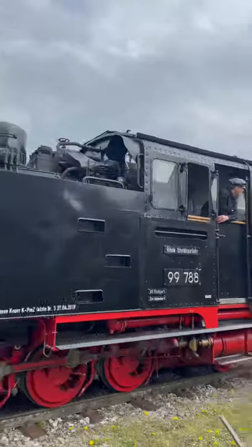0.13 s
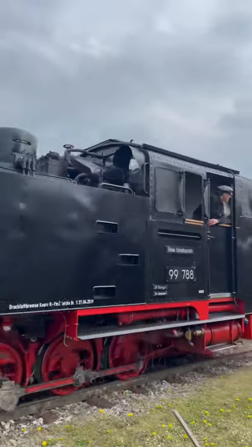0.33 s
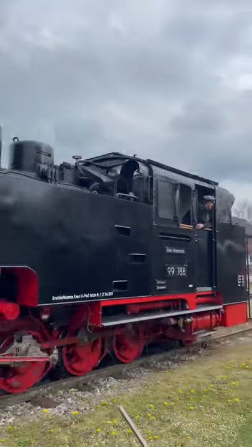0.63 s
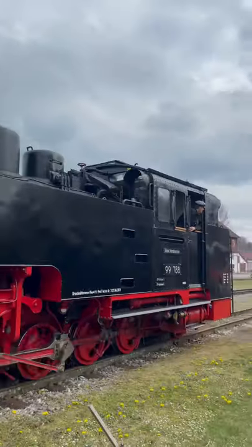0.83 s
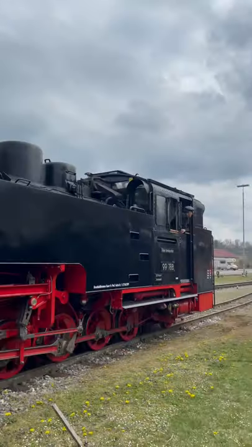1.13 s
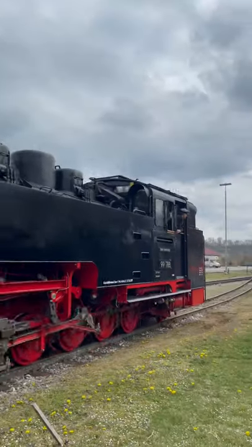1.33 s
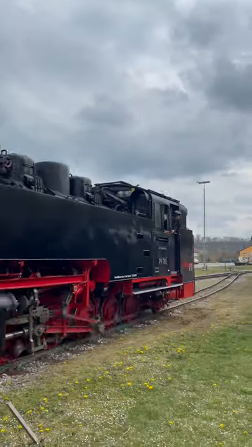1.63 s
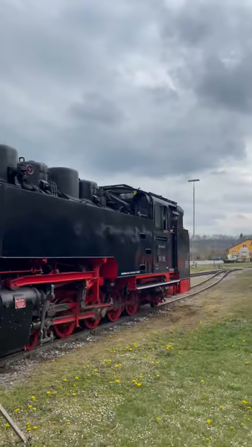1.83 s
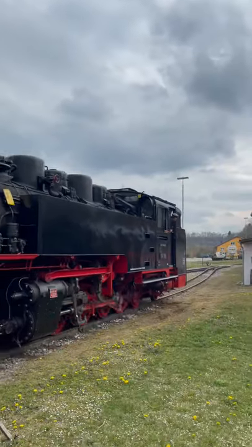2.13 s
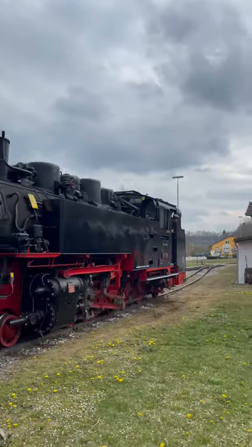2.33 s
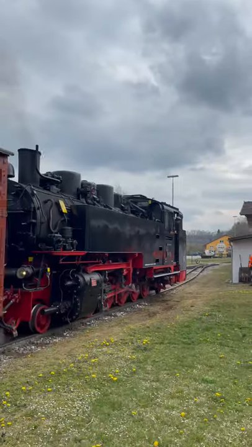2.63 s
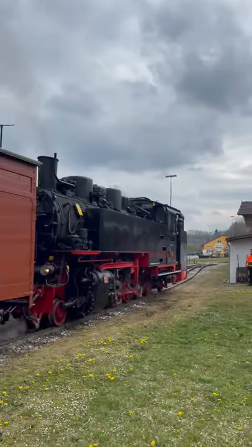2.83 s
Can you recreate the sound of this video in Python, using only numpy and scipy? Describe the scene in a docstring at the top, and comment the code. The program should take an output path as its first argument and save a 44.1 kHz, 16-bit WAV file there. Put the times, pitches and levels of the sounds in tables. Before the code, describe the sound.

Close stereo pickup in the open: a heavy steam engine passes, hissing at first, clanking over a rail joint several times, its thudding and rumble growing stronger, with puffs, metallic rattles, thin squeaks and low wind.

```python
"""Steam locomotive passing close by

A steam locomotive rolls past at walking pace, a few metres off, in the open.
Low sagging sines make exhaust beats thud over a rumble of coloured noise; contacts ring the iron at a rail joint.
Noise bursts make steam puffs and brief metallic rattles, a hiss lies high, rims sing, thin tones squeak, wind stirs.
Between the two stereo channels the phase lag broadly grows with pitch; likeness and balance vary with it too."""
import sys
import numpy as np
from scipy import signal
from scipy.fft import rfft, irfft, next_fast_len
from scipy.io import wavfile

SR = 44100
rng = np.random.default_rng(int(sys.argv[2]) if len(sys.argv) > 2 else 0)


def wav_out(sig):
    """Save sig, one row per channel (or a flat mono array), as 16-bit PCM at SR to the path in sys.argv[1]."""
    wavfile.write(sys.argv[1], SR, np.round(np.clip(np.atleast_2d(sig).T, -1, 1) * 32767).astype(np.int16))


def rack_gain(trim_db):
    """Turn a fader trim in dB into the linear factor to multiply a signal by."""
    fader = np.asarray(trim_db, float)
    return 10 ** (fader / 20)


N = 131859  # length in samples

# Rolling levels. Each row: time in seconds, deep rumble in dB, frame drumming in dB, wheel roar in dB.
ROLLING_LEVELS = [(0, -25, -35, -32), (.15, -31.5, -30, -32.5), (.33, -30, -32, -35),
                  (.5, -32.5, -35, -36.5), (.67, -34, -36, -33.5), (.78, -34, -28.5, -35),
                  (.87, -29, -22.5, -33), (1.0, -24, -25.5, -33.5), (1.15, -27, -26, -29.5),
                  (1.3, -28, -27, -31.5), (1.44, -24, -20, -33.5), (1.6, -22, -24.5, -28),
                  (1.78, -23, -21.5, -30.5), (1.93, -27, -25.5, -29.5), (2.13, -21.5, -23, -30),
                  (2.34, -20, -22.5, -25), (2.5, -32, -22, -28), (2.66, -21, -19.5, -27),
                  (2.8, -38, -20.5, -29), (2.99, -20.5, -26.5, -22)]
# Colour of the deep rumble. Each row: frequency in Hz, relative density in dB per Hz.
RUMBLE_COLOUR = [(22, -33), (32, -23), (45, -3), (63, 5), (85, -2.5), (120, -12), (200, -10)]
# Colour of the drumming frame. Each row: frequency in Hz, relative density in dB per Hz.
DRUMMING_COLOUR = [(80, -6.5), (130, -1), (180, -0.5), (250, 0), (330, -3.5), (420, -10.5), (700, -20),
                   (1200, -37)]
# Colour of the wheel roar. Each row: frequency in Hz, relative density in dB per Hz.
ROAR_COLOUR = [(250, -2), (450, 0), (700, -1), (1200, -4), (1700, -8), (2700, -10), (3800, -12),
               (5000, -18.5), (7000, -19), (9000, -26)]
# Low thuds: exhaust beats and bumps of the wheels. Each row: start in seconds, level in dB, settled pitch in Hz.
THUDS = [(.005, -25, 62), (0.056, -13, 156), (.09, -12, 57.4), (0.204, -13.5, 104.4), (.23, -14, 55),
         (.275, -19, 94), (0.359, -21, 80.6), (.465, -19, 80), (.71, -19, 77), (0.799, -26, 69),
         (0.829, -14, 167), (0.57, -15, 58.6), (0.85, -14, 60.4), (0.959, -9.5, 68), (1.13, -14, 59.6),
         (1.41, -23, 156), (1.511, -17, 55.7), (1.697, -7, 92), (1.98, -10, 75), (2.26, -11, 92.7),
         (2.545, -9.5, 70.4), (2.827, -25, 157)]
# Wheels on the joint. Each row: start in seconds, level in dB, low end in dB, treble in dB,
# fading time of the chatter in seconds, first contact in dB, best-driven pitch in Hz.
JOINT_BLOWS = [(.0572, -7, -2, -4, .011, 3, 1400), (.54, -8, -3, -5, .007, 3, 2550),
               (.545, -10, -1, -9, .006, 0, 1100), (1.4469, -5, -4, -5, .013, 2, 2150),
               (2.141, -11, -3, -8, .008, 8, 2150), (2.8453, -11, 0, -1, .004, 2, 2100),
               (2.8495, -6, 1, -4, .015, 2, 830)]
# Modes of the iron. Each row: frequency in Hz, level in dB, time to fall 60 dB in seconds.
IRON_MODES = [(250, -16.5, 0.13), (350.4, -17.5, 0.16), (556, -27, 0.084), (706, -19, 0.069),
              (850, -19.5, 0.059), (1070, -19, 0.07), (1430, -30, 0.044), (1623, -22, 0.035),
              (2180, -31, 0.041), (2430, -29, 0.096), (2690, -35, 0.055), (3250, -16.5, 0.033),
              (3790, -18, 0.042), (4425, -19.5, 0.055), (6050, -31, 0.04), (6700, -28, 0.032)]
# Short cracks of the contacts. Each entry: frequency in Hz.
CRACK_PITCHES = [1100, 2500, 6000]
# Colour of the crash. Each row: frequency in Hz, relative density in dB per Hz.
CRASH_COLOUR = [(150, 7), (300, 1.5), (700, 1.5), (1200, -3.5), (2000, -7), (3000, -5), (5000, -11.5),
                (6500, -9.5), (9000, -1), (12000, -5), (14500, -64)]
# Noise bursts: steam puffs and brief metallic rattles. Each row: time of full blast in seconds, level in dB,
# rise in seconds, fall in seconds, dullness in dB lost per band going up.
NOISE_BURSTS = [(.42, -32, 0.074, 0.14, 1.5), (.86, -34, 0.012, 0.045, 8), (.985, -26.5, 0.0092, 0.028, 3),
                (1.045, -31.5, 0.02, 0.025, 0.5), (1.08, -34, 0.019, 0.031, -1),
                (1.495, -21, 0.065, 0.054, 5), (1.539, -20.5, 0.018, 0.027, -0.5),
                (1.644, -24, 0.043, 0.022, 3.5), (1.705, -25, 0.029, 0.033, 2.5),
                (1.85, -34, 0.096, 0.072, 1), (2.165, -39, 0.0088, 0.023, 11),
                (2.194, -19.5, 0.028, 0.029, 10), (2.286, -20.5, 0.027, 0.034, 2.5),
                (2.35, -21.5, 0.022, 0.042, 1), (2.46, -35, 0.023, 0.032, -1),
                (2.58, -29, 0.0092, 0.033, 0.5), (2.671, -32, 0.039, 0.026, 0.5),
                (2.918, -24, 0.034, 0.031, 3), (2.945, -19, 0.027, 0.04, -1)]
# Colour of the bursts, with a gap near 9 kHz. Each row: frequency in Hz, relative density in dB per Hz.
BURST_COLOUR = [(400, 0.5), (800, 4.5), (1200, -2.5), (1700, 3), (2700, 2), (4400, 2), (6000, 0),
                (7000, -3.5), (8000, -1), (9200, -24), (11000, -1.5), (13000, -32)]
# High hiss. Each row: time in seconds, level of the hiss in dB, level of a separate band above 12 kHz in dB.
HISS_LEVELS = [(0.0, -29.5, -47), (0.08, -29.5, -43), (0.34, -32, -49), (0.62, -33.5, -54),
               (1.34, -34, -54), (1.65, -36, -72), (2.05, -37.5, -60), (2.46, -36.5, -77), (2.65, -37, -63),
               (2.99, -34.5, -58)]
# Colour of the hiss. Each row: frequency in Hz, relative density in dB per Hz.
HISS_COLOUR = [(4000, -21), (6000, -18), (7000, -13.5), (8000, -11), (9000, -7), (10000, -2), (10900, 1),
               (11500, -4), (12000, -11.5), (12600, -17), (13200, -28)]
# Colour of the separate band above 12 kHz. Each row: frequency in Hz, relative density in dB per Hz.
TOP_BAND_COLOUR = [(11800, -20), (12600, -2), (13300, -6), (14000, -13), (15800, -11)]
# Wheel rims singing on the rail. Each row: frequency in Hz, level in dB before swing and fade-in.
RIM_TONES = [(1190, -53.5), (1590, -48)]
# Squeaks of flanges and rods. Each row: start in seconds, length in seconds, mean pitch in Hz, level in dB.
SQUEAK_TONES = [(.395, .06, 3850, -45), (.4, .04, 3200, -46), (.47, .035, 3300, -44), (.58, .03, 1580, -43),
                (.88, .05, 2350, -46), (.87, .07, 1600, -45), (.97, .035, 2480, -40),
                (.985, .05, 3300, -44), (1.035, .035, 3280, -41), (1.035, .03, 3480, -43),
                (1.065, .03, 4080, -45), (1.075, .11, 2360, -41), (1.07, .08, 3730, -47),
                (1.18, .09, 4350, -50), (1.32, .05, 3740, -48), (1.375, .075, 3710, -46),
                (1.68, .05, 3100, -44), (2.34, .05, 3850, -41), (2.94, .03, 4700, -41)]
# Stereo phase, likeness and balance by pitch; the channels are nearly alike around 6, 9 and above 12 kHz.
# Each row: frequency in Hz, lead of the left channel in radians, likeness from 0 to 1, left over right in dB.
STEREO_BY_PITCH = [(30, .2, .9, .5), (250, .05, .97, .7), (450, .2, .9, 1), (700, .45, .75, 3.8),
                   (1200, .15, .8, 2.5), (1700, .1, .93, 2.5), (2200, .25, .75, 1), (2700, 1.2, .35, .8),
                   (3200, 2.3, .5, 1.8), (3800, 1.1, .35, 1), (4400, 1.8, .6, .8), (4900, 3.2, .8, -1.5),
                   (5500, 5.6, .75, .3), (5900, 6.28, .97, 0), (6300, 6.5, .95, 0), (7000, 7.5, .75, -.4),
                   (7900, 8.8, .8, -.5), (8300, 9.25, .985, 0), (8900, 9.35, .997, 0),
                   (9050, 9.42, .9999, 0), (9600, 9.43, .9999, 0), (9900, 9.85, .95, 0),
                   (11000, 11.1, .92, 0), (11600, 11.9, .95, 0), (11900, 12.566, 1, 0),
                   (14300, 12.566, 1, 0), (14600, 15.5, .97, 0)]
# Colour of the wind in each channel. Each row: frequency in Hz, relative density in dB per Hz.
WIND_COLOUR = [(25, -16), (45, -16), (70, 2.5), (150, -1), (300, -8), (600, -15.5), (1000, -20.5)]


def in_time(rows):
    """Columns of a curve, sample by sample."""
    s, *columns = np.transpose(rows)
    return [np.interp(np.arange(N) / SR, s, c) for c in columns]


def rms_one(x):
    """Scales to rms 1."""
    return x / np.sqrt(np.mean(x ** 2) + 1e-20)


def drift(corner_hz):
    """Slow chance of spread 1: white noise through two equal low-pass poles, at a fortieth of the sample rate."""
    r = np.exp(-80 * np.pi * corner_hz / SR)
    slow = signal.lfilter([1], [1, -2 * r, r * r], rng.standard_normal(N // 40 + 2002))[2000:]
    return np.interp(np.arange(N) / 40, np.arange(len(slow)), rms_one(slow - slow.mean()))


def noise(colour, grain_db=0.):
    """Two unrelated rows (direct, scattered) of coloured noise; grain makes some samples stand out; rms 1."""
    hz, db = np.transpose(colour)
    f = np.arange(N // 2 + 1) * SR / N + 1
    gain = rack_gain(np.interp(np.log(f), np.log(hz), db, left=-80, right=-80))
    grain = rack_gain(grain_db * np.minimum(rng.exponential(1, N), 6))
    white = rng.standard_normal((2, N)) * grain
    return rms_one(irfft(rfft(white) * gain, N))


def ring(clicks, hz, t60_s):
    """A damped resonance: a unit click sets a sine of height 1 ringing."""
    r, w = rack_gain(-60 / (t60_s * SR)), 2 * np.pi * hz / SR
    return signal.lfilter([0, np.sin(w)], [1, -2 * r * np.cos(w), r * r], clicks + 1e-18)


def rolling():
    """Deep rumble, drumming of the frame and grainy roar of wheels on rail, each noise wavering in level."""
    rumble_db, drum_db, roar_db = in_time(ROLLING_LEVELS)
    lumps = drift(1.7)  # shared by frame and roar
    rumble = rack_gain(rumble_db + 0.4 * drift(7.4)) * noise(RUMBLE_COLOUR)
    drumming = rack_gain(drum_db + 1.23 * lumps + 0.4 * drift(26.0)) * noise(DRUMMING_COLOUR)
    roar = rack_gain(roar_db + 0.15 * lumps + 1.44 * drift(30.0)) * noise(ROAR_COLOUR, grain_db=2.0)
    return rumble + drumming + roar


def beats():
    """Each thud is a short low sine that starts sharp and sags to its settled pitch."""
    rise_s, t60_s = 0.013, 0.2
    sag, sag_s = 0.26, 0.025  # extra pitch at the start as a share, and its decay time
    out, t = np.zeros((2, N + SR)), np.arange(SR // 2) / SR
    bent_time = t + sag * sag_s * (1 - np.exp(-t / sag_s))
    for s, db, hz in THUDS:
        start = int(s * SR)
        shape = (1 - np.exp(-(t / rise_s) ** 2)) * rack_gain(db - 60 * t / t60_s)
        turns = hz * bent_time + rng.random((2, 1))
        out[:, start:start + len(t)] += shape * np.sin(2 * np.pi * turns)
    return out[:, :N]


def region(hz):
    """Numbers the lows 0, the middle 1 and the treble 2."""
    return np.digitize(hz, [600, 3500])


def crash():
    """Noise of each blow: holds for half the chatter's fading time, then dies raggedly in three regions."""
    crash_db, t60_s = -11.5, 0.14
    t, f = np.arange(N) / SR, np.arange(N // 2 + 1) * SR / N
    whole = rfft(noise(CRASH_COLOUR))
    swells = np.zeros((3, N))
    for s, db, low_db, treble_db, length, _, _ in JOINT_BLOWS:
        age = np.maximum(t - s, 0)
        gains = rack_gain(db + np.array([[low_db], [0], [treble_db]]))
        decay = rack_gain(crash_db - 60 * np.maximum(age - .5 * length, 0) / t60_s)
        swells += gains * (t >= s) * decay
    out = np.zeros((2, N))
    for k in range(3):
        out += swells[k] * rack_gain(2.9 * drift(79.0)) * irfft(whole * (region(f) == k), N)
    return out


def contacts():
    """One train of touches per blow: a first contact, then random chatter that fades."""
    touches_per_s, chatter_db = 800, -5
    t, chance = np.arange(N) / SR, rng.random(N)
    trains = []
    for s, db, _, _, length, first_db, _ in JOINT_BLOWS:
        fade = np.exp(-(np.maximum(t - s, 0) / length) ** 2)
        touch = (t >= s) * rack_gain(chatter_db) * (chance < touches_per_s / SR) * fade
        touch[int(s * SR) + 1] = rack_gain(first_db)
        trains.append(rack_gain(db) * touch)
    return np.array(trains)


def iron():
    """Contacts set the iron's modes and short cracks ringing; the low modes answer late."""
    low_lag_s, drive_db, drive_octaves = 0.0032, 6, .2
    s, _, low_db, treble_db, _, _, best_hz = np.transpose(JOINT_BLOWS)
    firsts, trains = (s * SR).astype(int) + 1, contacts()
    cracks = [(hz, -6, .004) for hz in CRACK_PITCHES]  # level in dB, 60 dB decay in seconds
    out = np.zeros((2, N))
    for k, (hz, db, t60_s) in enumerate(list(IRON_MODES) + cracks):
        sizes = rng.choice([-1, 1], (2, N)) * rack_gain(4.4 * rng.standard_normal((2, N)))
        # the first contact is firm in every mode, its sign alternating from mode to mode
        sizes[:, firsts] = [[1 if k >= len(IRON_MODES) else (-1) ** k], [.4]]
        favour_db = drive_db * np.exp(-(np.log2(hz / best_hz) / drive_octaves) ** 2)
        drive = rack_gain([low_db, 0 * s, treble_db][region(hz)] + favour_db)
        lag = int(low_lag_s * SR) * (region(hz) == 0)
        clicks = np.roll((drive @ trains) * sizes, lag, axis=1)
        out += rack_gain(db) * ring(clicks, hz, t60_s)
    return out


def clanks():
    """Wheels over the joint: crash and ringing iron together, with the highest treble softened."""
    soften = signal.butter(2, 7500, fs=SR, output="sos")  # low-pass corner in Hz
    return signal.sosfilt(soften, crash() + iron())


def bursts():
    """Steam puffs and brief metallic rattles: sputtering noise that swells and fades, tilted over four bands."""
    t, f = np.arange(N) / SR, np.arange(N // 2 + 1) * SR / N
    sputter_db = .8 * drift(110)  # shared by all bands
    whole = rfft(noise(BURST_COLOUR, grain_db=3.0))
    out = np.zeros((2, N))
    for k, (low, high) in enumerate([(0, 1500), (1500, 3000), (3000, 5500), (5500, 20000)]):  # Hz
        level = np.zeros(N)
        for s, db, rise, fall, dull in NOISE_BURSTS:
            swell = np.exp(-((t - s) / np.where(t < s, rise, fall)) ** 2)
            level += rack_gain(db - dull * (k - 0.5)) * swell
        band = irfft(whole * (f >= low) * (f < high), N)
        out += level * rack_gain(1.6 * drift(30.0) + sputter_db) * band
    return out


def high_hiss():
    """High hiss, and a separate band above 12 kHz that comes and goes; both share a flutter."""
    hiss_db, top_db = in_time(HISS_LEVELS)
    flutter_db = 0.91 * drift(24.0)
    hiss = rack_gain(hiss_db + flutter_db) * noise(HISS_COLOUR)
    top_band = rack_gain(top_db + flutter_db + 1.3 * drift(15.)) * noise(TOP_BAND_COLOUR)
    return hiss + top_band


def rims():
    """Wheel rims sing faintly: noise rings narrow resonances whose level swings slowly."""
    start_s, rise_s, swing_db, t60_s = .8, .15, 5.5, 1 / 3
    out = np.zeros((2, N))
    for hz, db in RIM_TONES:
        tone = rms_one(ring(rng.standard_normal((2, N)), hz, t60_s))
        out += rack_gain(db + swing_db * drift(3.0)) * tone
    return out * np.clip((np.arange(N) / SR - start_s) / rise_s, .2, 1)


def squeaks():
    """Flanges and rods squeak: short thin sines that waver in pitch and strength."""
    waver, edge_s = .004, .015  # pitch waver as a share, fade at each end
    t, out = np.arange(N) / SR, np.zeros((2, N))
    for s, length, hz, db in SQUEAK_TONES:
        # the scattered row runs a quarter turn behind the direct one
        turns = np.cumsum(hz * (1 + waver * drift(60))) / SR + np.array([[0], [-.25]])
        edges = np.clip(np.minimum(t - s, s + length - t) / edge_s, 0, 1)
        out += np.sqrt(2) * edges * rack_gain(db + 2.5 * drift(40)) * np.sin(2 * np.pi * turns)
    return out


def wind():
    """Low gusty noise that stirs each channel on its own."""
    gusts_db = 3.7 * np.array([drift(14.8), drift(8.0)])
    return rack_gain(-27 + gusts_db) * noise(WIND_COLOUR)


def stereo(x):
    """Direct sound is alike in both channels, scattered sound opposed; then the lag and balance by pitch."""
    size = next_fast_len(N + 8000)
    f = np.arange(size // 2 + 1) * SR / size
    hz, *columns = np.transpose(STEREO_BY_PITCH)
    lead, alike, pan_db = [np.interp(f, hz, c) for c in columns]
    alike, side = np.clip(alike, 0, 1), np.array([[1], [-1]])  # side: left, right
    direct, scattered = rfft(x, size)
    both = (np.sqrt(1 + alike) * direct + side * np.sqrt(1 - alike) * scattered) / np.sqrt(2)
    return irfft(both * np.exp(.5j * side * lead) * rack_gain(.5 * side * pan_db), size)[:, :N]


def scene():
    """All sounds but the wind are spread in stereo; the wind is added to each channel directly."""
    train = rolling() + beats() + clanks() + bursts() + high_hiss() + rims() + squeaks()
    return stereo(train) + wind()


def low_pass(x):
    """Removes everything above the highest recorded frequency."""
    return signal.sosfilt(signal.butter(12, 14960, fs=SR, output="sos"), x)


def record(dry):
    """The highest peaks are rounded towards a ceiling just under full scale."""
    ceiling = .95
    rounded = np.tanh((np.abs(dry) / ceiling) ** 3) ** (1 / 3)
    mix = ceiling * rounded * np.sign(dry)
    return low_pass(mix)


dry = scene()
out = record(dry)
wav_out(out)
```